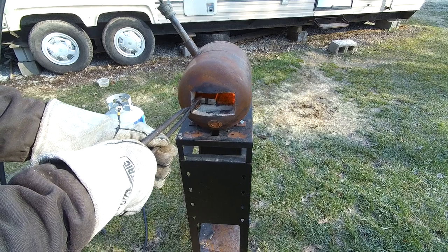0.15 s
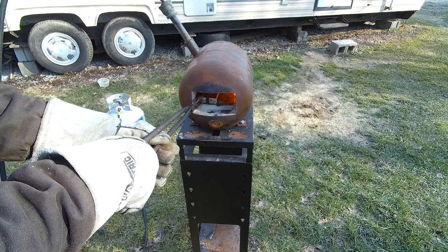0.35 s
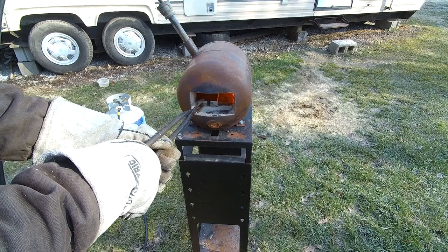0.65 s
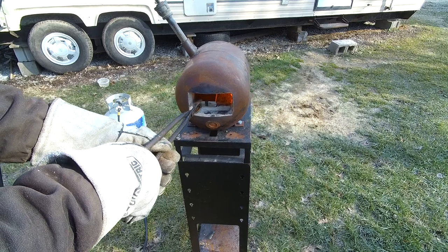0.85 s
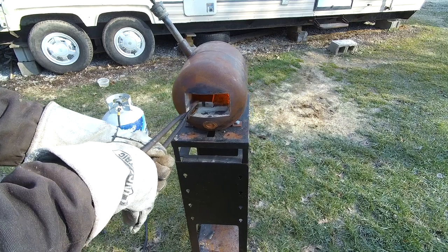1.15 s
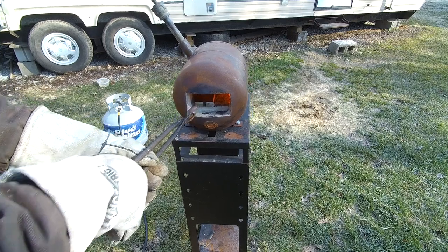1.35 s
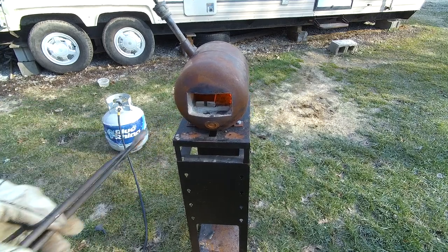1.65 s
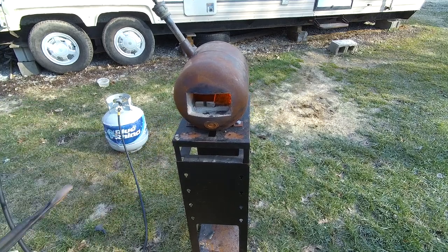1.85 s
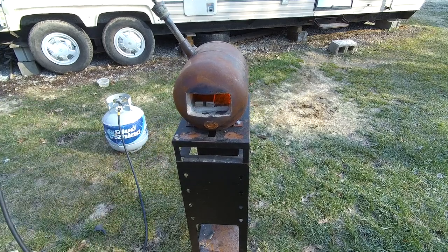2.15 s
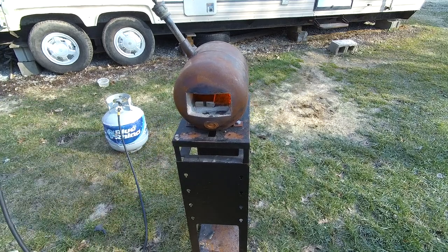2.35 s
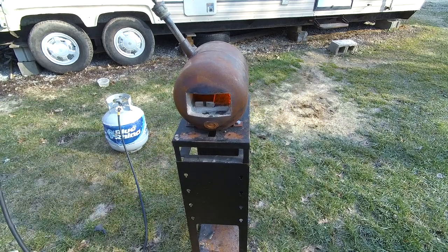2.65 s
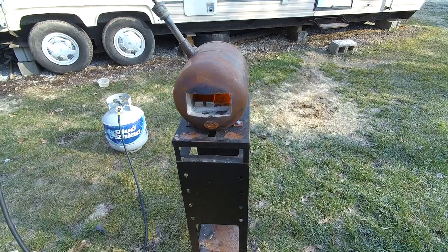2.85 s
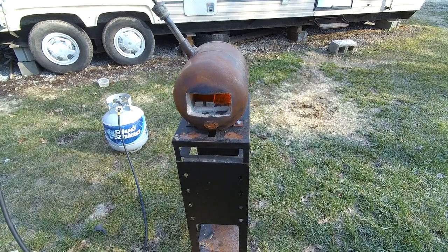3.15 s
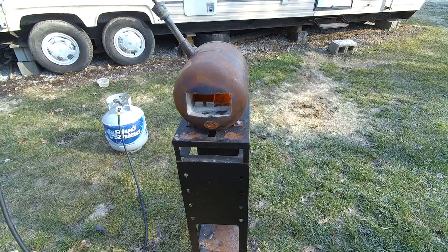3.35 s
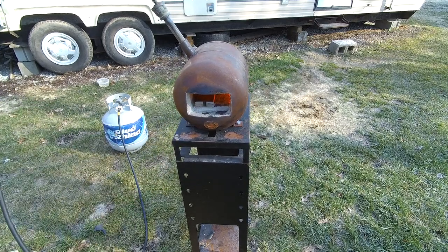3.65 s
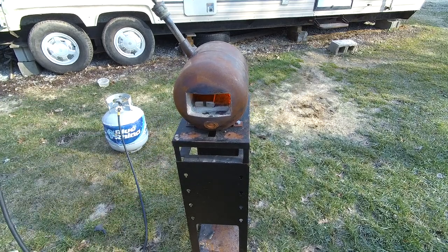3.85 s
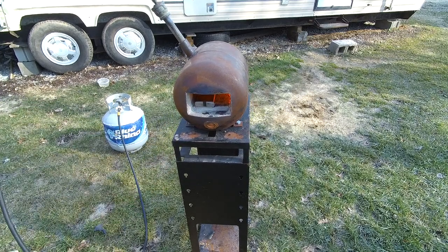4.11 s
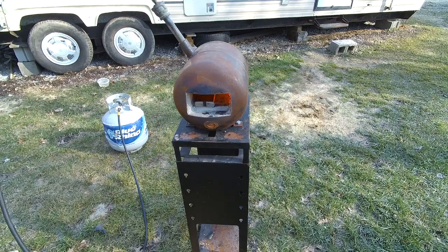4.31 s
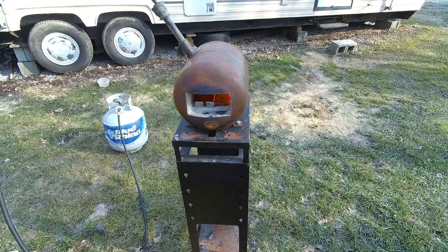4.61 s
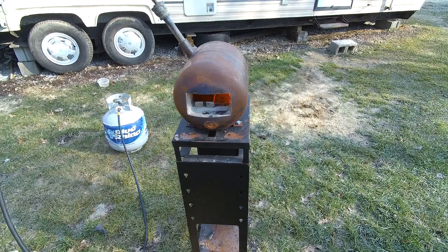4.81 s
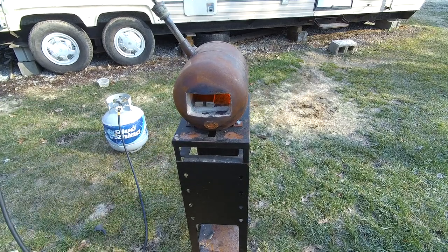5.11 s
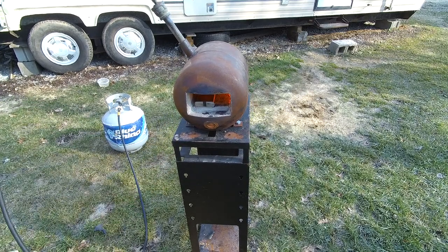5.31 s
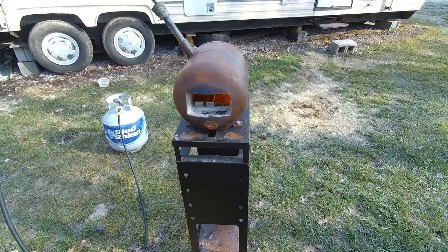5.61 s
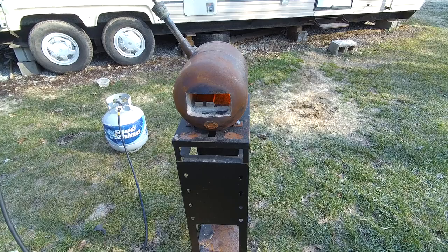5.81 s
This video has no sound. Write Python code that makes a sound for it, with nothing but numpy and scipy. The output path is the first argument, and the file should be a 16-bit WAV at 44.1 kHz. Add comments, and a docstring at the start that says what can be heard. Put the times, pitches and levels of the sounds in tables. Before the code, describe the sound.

A small gas forge burns on a lawn, heard from about a metre away in mono. A dense low roar dominates from start to end, rough and hollow, flaring and sagging rapidly. A much quieter gas hiss flutters above it. Around one and a half seconds tongs faintly brush firebrick while gloved arms draw back, and the tone sweeps downward and clears by 2.7 seconds. A light breeze nudges the microphone late on.

```python
"""A propane forge on a lawn, microphone about a metre off: the flame's random collapses roar, filtered noise hisses.
At first a smith's gloved arms close by reflect the sound; the jet flutters, spurts and whistles at 0.7 and 1 s.
From 1.1 s the arms draw back, the tongs brush the firebrick near 1.5 and 1.7 s, the colour sweeps down and clears
by 2.65 s. The jet whistles again at 3.9 and 4.2 s; a light breeze on the microphone is strongest near 4.85 s.
Throughout, the flame flares, and the ground answers some 5 ms late, which makes the roar hollow."""
import sys
import numpy as np
from scipy import signal
from scipy.fft import rfft, irfft, next_fast_len
from scipy.io import wavfile
from scipy.ndimage import uniform_filter1d, map_coordinates

SR = 44100
rng = np.random.default_rng(int(sys.argv[2]) if len(sys.argv) > 2 else 0)


def generate_wav(sig):
    """Save sig (samples, or channels by samples) to the path in sys.argv[1] as 16-bit PCM at SR."""
    pcm = np.round(np.clip(np.atleast_2d(sig).T, -1, 1) * 32767).astype(np.int16)
    wavfile.write(sys.argv[1], SR, pcm)


N = 263277  # samples

# Spectra of the flame: deep boom, roar, rush at the mouth, rough upper edge [f/Hz, relative level/dB]
BOOM_SPECTRUM = [(25, -48), (52, -18), (75, -7.5), (110, -4), (140, -0.5), (190, 4.5), (235, 4), (295, -2),
                 (370, -19.5), (500, -37)]
ROAR_SPECTRUM = [(170, -36), (240, -20.5), (295, -5), (360, 1), (420, -1.5), (475, 0), (530, -5),
                 (620, -18), (720, -37), (1300, -66)]
RUSH_SPECTRUM = [(350, -37), (520, 4.5), (620, 10), (700, 2.5), (810, 1), (920, -5), (1050, -11),
                 (1200, -16), (1400, -22), (2000, -27), (3500, -67)]
EDGE_SPECTRUM = [(750, -28), (950, -1), (1070, 2), (1250, -3.5), (1450, -6), (1800, -11), (2400, -30)]
# Brighter rush out of the mouth, before flares and flicker [t/s, level/dB]
MOUTH_LEVEL = [(0, -22), (.18, -28), (.4, -22.5), (.85, -22.5), (1.08, -25), (1.3, -24), (1.6, -22.5),
               (1.9, -21.5), (2.08, -21.5), (2.4, -22), (2.9, -20.5), (3.3, -22), (3.5, -21), (4.5, -22.5),
               (4.8, -19.5), (5.25, -20.5), (5.65, -21.5), (5.85, -19)]
# The roar's rough upper edge [t/s, level/dB]
EDGE_LEVEL = [(0, -37), (.2, -48), (.4, -40.5), (.8, -45), (1.07, -40), (1.33, -46), (1.7, -41), (2.2, -47),
              (2.6, -55), (2.8, -43.5), (3.6, -46), (4, -46), (4.8, -52), (5.1, -54), (5.6, -44),
              (5.97, -58)]
# Brief flares, or sags where negative [peak t/s, length/s, boom rise/dB, roar rise/dB, rush rise/dB]
FLARES = [(0.03, 0.069, -2, 2.5, 2), (0.16, 0.013, 6, 1, 3), (0.25, 0.035, -7, 1, 9.5),
          (0.4, 0.033, -5, 1, -1.5), (0.87, 0.042, 0.5, -4.5, 0.5), (0.92, 0.04, -4.5, 1.5, 0.5),
          (1.1, 0.043, 5.5, 4, 3), (1.3, 0.018, -10.5, 5.5, -1), (1.41, 0.048, -4, -4, 1.5),
          (1.52, 0.019, 3, -2, 2.5), (1.68, 0.069, 1.5, -1.5, -1), (1.75, 0.026, 1, 3.5, -4),
          (1.9, 0.17, -1.0, -1.5, -3.0), (2.01, 0.035, 3, 0, -0.5), (2.14, 0.051, 0.5, -1, 2),
          (2.26, 0.033, -2.5, 6, 1), (2.43, 0.017, -9.5, 0, 1.5), (2.66, 0.025, -2.0, -12.5, -0.5),
          (3.48, 0.063, -3, -2.5, -1.5), (3.79, 0.04, -5, 3.5, -0.5), (3.98, 0.032, -5, 3, 1.5),
          (4.08, 0.043, -1.0, 0, -1), (4.19, 0.04, 0, -1.5, 1.5), (4.26, 0.035, 5.5, -2, 3),
          (4.34, 0.066, -0.5, -1.0, -2), (4.5, 0.095, -0.5, 1, 0), (4.59, 0.053, -3.5, -0.5, 0),
          (4.73, 0.13, -2.5, -1.5, 0.5), (4.88, 0.03, 2, 5, 0.5), (5.13, 0.04, 0, 2, -0.5),
          (5.37, 0.046, -3, -5.5, -0.5), (5.88, 0.044, -4.5, -2.0, -5.5)]
BOOM_START_DB, BOOM_FADE_DB_PER_S, ROAR_DB = -16.5, 0.09, -17.5  # before flares
ROAR_HEAVE_DB, HEAVES_PER_S = 0.32, 12
RUSH_FLICKER_DB, FLICKERS_PER_S = 1.3, 16
WANDER_SHARE, WANDERS_PER_S = 0.035, 9  # change of lag, in samples per sample

# Spectra of the gas jet: hiss and the finer spray above it [f/Hz, relative level/dB]
HISS_SPECTRUM = [(700, -24.5), (1100, 4.5), (1500, 4.5), (1750, 3.5), (2200, -2.5), (2750, -0.3),
                 (3300, -1.9), (3900, -5.5), (4350, -8.5), (4700, -10.5), (5000, -12), (5500, -22),
                 (7000, -35.5), (10000, -61.5)]
SPRAY_SPECTRUM = [(3000, -15), (4900, 0), (5400, 0.5), (6000, 2), (6900, 3), (7550, -1.5), (8100, -1),
                  (8600, -0.2), (9900, 0.8), (10900, -1.5), (11700, -4), (13000, -4), (13600, -3),
                  (14300, -7.5), (15000, -7)]
# Strength of the gas flow, driving hiss and spray [t/s, level about the usual/dB]
FLOW = [(.08, 1.5), (.5, -0.9), (.86, -2.5), (1, 0.9), (1.3, -3.5), (1.6, -1.6), (1.82, 0.5), (2.15, 1),
        (2.5, -0.8), (2.9, 1.8), (3.3, 0.1), (3.55, 0.5), (3.92, 2), (4.05, 1.5), (4.5, 1.5), (4.8, 3),
        (5.05, 3), (5.2, 0.5), (5.97, 1.1)]
# Short spurts, or stalls where negative [peak t/s, length/s, hiss rise/dB, spray rise/dB]
SPURTS = [(.06, 0.033, -5, 0), (.32, 0.035, 0, -4.5), (.5, 0.024, 3, 5.5), (.58, 0.07, 1, 5),
          (.73, 0.043, 5.5, 5.5), (.87, 0.031, 0, -1), (1.37, .035, 2, 4.5), (1.498, 0.055, 3, 0.5),
          (1.68, 0.099, 1.5, 3), (1.8, 0.18, -1.5, -3.5), (2.11, 0.044, 3.5, 3), (2.33, 0.075, -0.5, 2.5),
          (2.45, 0.027, 0, 4.5), (2.57, .04, 3.5, 3), (2.67, .05, -3.5, -1), (2.8, .045, 2, 3),
          (2.99, 0.04, 4.5, 3.4), (3.21, .05, -0.5, 3), (3.385, .04, 1, 4.5), (3.46, 0.071, -1.5, -1.5),
          (3.71, .045, 1, 2.5), (3.79, 0.058, -2.5, -4), (3.98, 0.05, 0, 1), (4.195, 0.026, 3, 4.5),
          (4.28, 0.033, 3, 1.5), (4.59, 0.031, 2, 2.5), (4.75, .04, 2, 2.5), (4.8, 0.035, 2, -2),
          (4.915, .025, -1, -3), (4.97, .04, -4, 0.5), (5.15, 0.03, -1, -2), (5.3, .04, 3.5, 2),
          (5.345, 0.028, 0, -4), (5.42, 0.089, 2, 3), (5.495, 0.03, -2, -3.5), (5.61, 0.024, 3, 3.5),
          (5.785, 0.088, 4, 3)]
HISS_DB, SPRAY_DB = -46, -59  # at the usual flow
SPRAY_PER_FLOW = 1.1  # dB per dB: the spray swings wider than the hiss
FLUTTERS_PER_S, HISS_FLUTTER_DB, SPRAY_FLUTTER_DB = 45, 0.3, 0.65
PRESSURE_DB = 0.7  # rise of the jet per rms of flame pressure
SIZZLE_DB, SIZZLES_PER_S = 1.1, 660  # fast random grain
PATCH_DB = 1.05  # rms flicker of the noise patches
# Brief whistles of the jet [peak t/s, length/s, pitch f/Hz, level/dB]
WHISTLES = [(0.738, .05, 5100, -59), (.96, .04, 5000, -56), (3.9, .04, 6960, -61), (4.19, .035, 6900, -61)]
WHISTLE_WIDTH_HZ = 420  # at half amplitude

# Tongs brushing the firebrick [peak t/s, length/s, level/dB]
BRUSHES = [(1.497, 0.046, -49), (1.688, .09, -53)]
# Spectrum of the gritty brush [f/Hz, relative level/dB]
GRIT_SPECTRUM = [(1800, -27), (2700, 0), (3150, -8), (3650, -1), (4400, -14), (7000, -27)]

# Arms at rest, then drawing back [t/s, extra path of their echo/m, echo strength 0-1 before ARM_REFLECTION]
ARMS = [(0, .31, .31), (1.1, .314, .34), (1.6, .338, .33), (1.75, .385, .29), (1.87, .47, .25),
        (2.15, .72, .32), (2.3, .79, .2), (2.65, .98, 0)]
# How well the arms reflect; long waves bend round them [f/Hz, level/dB]
ARM_REFLECTION = [(200, -18), (500, -10), (680, -1), (950, 0), (1200, 0), (1500, 5), (1750, 0), (2150, 0),
                  (2750, -13), (3400, -1), (3900, -12), (5000, -5), (6000, -10), (9000, -16)]
SOUND_M_PER_S = 343
# Ground echo as the hand-held microphone drifts [t/s, lag/s]
GROUND_LAG = [(0, .00482), (.75, .00481), (1.2, .00487), (1.9, .00485), (2.3, .00479), (3.8, .00473),
              (6, .00472)]

# Breeze on the microphone [t/s, level/dB], and its spectrum [f/Hz, relative level/dB]
BREEZE_LEVEL = [(0.0, -45), (0.35, -39), (1.2, -44), (1.85, -42), (2.3, -39), (3.7, -38), (4.85, -30),
                (5.4, -39), (5.75, -36), (5.97, -38)]
BUFFET_SPECTRUM = [(8, -25), (20, -14), (40, 2), (55, 8), (90, -21), (200, -45)]
TOP_HZ = 14950  # band limit


def flame():
    """Thousands of collapses a second merge into boom, roar, rush and edge, each surging in its own way."""
    mouth_db, = curves(MOUTH_LEVEL)
    edge_db, = curves(EDGE_LEVEL)
    boom_flare_db, roar_flare_db, rush_flare_db = bells(FLARES)
    burning = collapses(rate=3300)
    boom = past_arms(over_ground(wandering(coloured(burning, BOOM_SPECTRUM)), echo=0.11))
    roar = past_arms(over_ground(wandering(coloured(burning, ROAR_SPECTRUM)), echo=0.11))
    rush = past_arms(over_ground(coloured(burning, RUSH_SPECTRUM), echo=0.097))
    edge = over_ground(coloured(collapses(rate=6000), EDGE_SPECTRUM), echo=0.22)

    boom_db = BOOM_START_DB - BOOM_FADE_DB_PER_S * np.arange(N) / SR + boom_flare_db
    roar_db = ROAR_DB + roar_flare_db + ROAR_HEAVE_DB * wobble(HEAVES_PER_S)
    rush_db = mouth_db + rush_flare_db + RUSH_FLICKER_DB * wobble(FLICKERS_PER_S)
    shell = amp(boom_db) * steady(boom, span=0.2) + amp(roar_db) * steady(roar, span=0.14)
    mouth = amp(rush_db) * steady(rush, span=0.28) + amp(edge_db) * edge
    return shell + mouth


def collapses(rate):
    """Pockets of burning gas collapse at random, rate a second, each a one-sample drop in pressure."""
    pockets = rng.random(N) < rate / SR
    return pockets.mean() - pockets


def wandering(x):
    """Hot gas swirls in the shell: a moving delay drifts its resonances a little up and down."""
    lag_samples = np.cumsum(WANDER_SHARE * wobble(WANDERS_PER_S))
    return delayed(x, lag_samples / SR)


def jet(pressure):
    """Turbulent gas hisses with its flow, flutters and spurts; its level rises and falls with flame pressure."""
    flow_db, = curves(FLOW)
    hiss_spurt_db, spray_spurt_db = bells(SPURTS)
    hiss = past_arms(over_ground(coloured(turbulence(), HISS_SPECTRUM), echo=0.43))
    spray = past_arms(coloured(turbulence(), SPRAY_SPECTRUM))
    flutter = wobble(FLUTTERS_PER_S)
    grain = amp(SIZZLE_DB * wobble(SIZZLES_PER_S) + PRESSURE_DB * unit(pressure))
    hiss_db = HISS_DB + flow_db + hiss_spurt_db + HISS_FLUTTER_DB * flutter
    spray_db = SPRAY_DB + SPRAY_PER_FLOW * flow_db + spray_spurt_db + SPRAY_FLUTTER_DB * flutter
    return grain * (amp(hiss_db) * hiss + amp(spray_db) * spray)


def turbulence():
    """Noise whose bands flicker each on their own, in patches about 3 kHz wide and 40 ms long."""
    bands = signal.stft(rng.standard_normal(N), nperseg=256)[2]
    field = uniform_filter1d(rng.standard_normal(bands.shape), size=18, axis=0)  # along frequency
    field = uniform_filter1d(field, size=14, axis=1)  # along time
    return signal.istft(bands * amp(PATCH_DB * unit(field)), nperseg=256)[1][:N]


def whistles():
    """Now and then the jet narrows for a moment to a breathy whistle: a narrow band of noise."""
    out = np.zeros(N)
    for peak_s, length, pitch_hz, db in WHISTLES:
        band = filtered(rng.standard_normal(N), lambda hz: 1 / (1 + (2 * (hz - pitch_hz) / WHISTLE_WIDTH_HZ) ** 2))
        swell = bells([(peak_s, length, 1)])[0]
        out += amp(db) * swell * unit(band)
    return out


def tongs():
    """The steel tongs brush the firebrick as they slide out of the mouth: swells of gritty noise."""
    stroke = sum(amp(db) * bells([(peak_s, length, 1)])[0] for peak_s, length, db in BRUSHES)
    return stroke * over_ground(coloured(rng.standard_normal(N), GRIT_SPECTRUM), echo=0.3)


def past_arms(x):
    """The arms scatter back an inverted copy; as they draw back its notches slide down and fade."""
    path_m, strength = curves(ARMS)
    scattered = filtered(x, lambda hz: along(ARM_REFLECTION, hz))
    return x - strength * delayed(scattered, path_m / SOUND_M_PER_S)


def over_ground(x, echo):
    """Direct sound plus its late copy off the ground: a comb with teeth about 210 Hz apart, at rms 1."""
    lag, = curves(GROUND_LAG)
    return unit(x + echo * delayed(x, lag))


def breeze():
    """Soft lumps of wind on the microphone: low-frequency noise."""
    level_db, = curves(BREEZE_LEVEL)
    return amp(level_db) * steady(coloured(rng.standard_normal(N), BUFFET_SPECTRUM), span=0.55)


def amp(db):
    """Decibels to gain."""
    return 10 ** (np.asarray(db) / 20)


def unit(x):
    """x at rms 1."""
    return x / np.sqrt(np.mean(x ** 2) + 1e-20)


def curves(rows):
    """One value per sample for each column after the time, on straight lines between rows."""
    s, *cols = np.transpose(rows)
    return [np.interp(np.arange(N) / SR, s, c) for c in cols]


def bells(rows):
    """Each row swells and falls as a bell, length wide at half rise; returns the sum for each column of rises."""
    t = np.arange(N) / SR
    return sum(np.outer(rises, 0.5 ** ((2 * (t - peak_s) / length) ** 2)) for peak_s, length, *rises in rows)


def wobble(rate):
    """A smooth random curve through normal-distributed knots, rate knots a second."""
    knots = rng.standard_normal(4096)
    return map_coordinates(knots, [np.arange(N) * rate / SR], mode="wrap")


def delayed(x, lag):
    """x heard lag seconds late; the lag may move."""
    return map_coordinates(x, [np.arange(N) - lag * SR], mode="mirror")


def filtered(x, response):
    """x times a response of frequency, padded against wrap-around."""
    m = next_fast_len(N + SR // 2)
    return irfft(rfft(x, m) * response(np.fft.rfftfreq(m, 1 / SR)), m)[:N]


def along(points, hz):
    """Gain along (f/Hz, level/dB) points on a log axis, practically silent above the last."""
    f, db = np.transpose(points)
    return amp(np.interp(np.log(hz + 1), np.log(f), db, right=-120))


def coloured(x, spectrum):
    """x shaped by the given spectrum, at rms 1."""
    return unit(filtered(x, lambda hz: along(spectrum, hz)))


def steady(x, span):
    """x evened out by its running rms, under a bell about half of span seconds wide."""
    window = signal.get_window("hann", SR) ** (1 / max(span, 0.05) ** 2)

    def running_sum(v):
        return signal.fftconvolve(v, window, "same")

    power = np.abs(running_sum(x ** 2) / running_sum(np.ones(N)))
    return x / np.sqrt(power + 1e-12)


def scene():
    """Flame, jet, whistles, tongs and breeze in one channel."""
    fire = flame()
    return (fire + jet(fire) + whistles() + tongs() + breeze())[None]


def record(dry):
    """The highest peaks are rounded off, the ends fade over 3 ms, and nothing above the band limit is kept."""
    rounded = dry[0] / (1 + np.abs(dry[0]) ** 10) ** (1 / 10)
    soft_ends = signal.get_window(("tukey", 0.001), N)
    return filtered(rounded * soft_ends, lambda hz: hz < TOP_HZ)[None]


dry = scene()
out = record(dry)
generate_wav(out)
```